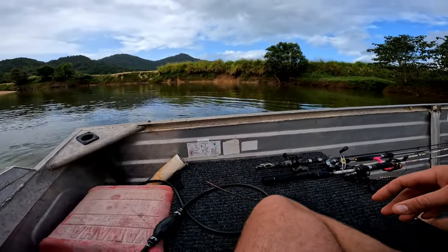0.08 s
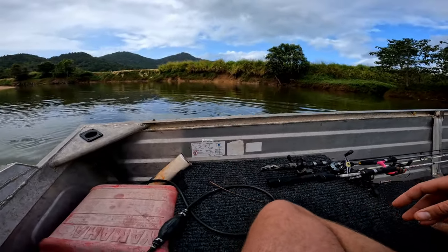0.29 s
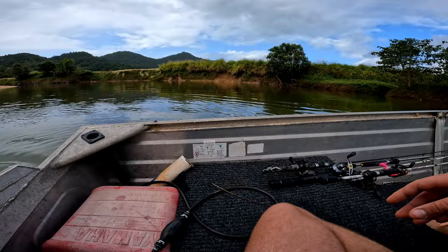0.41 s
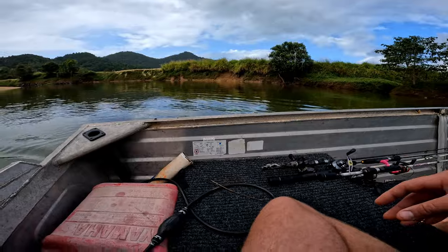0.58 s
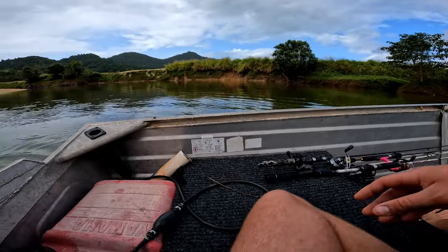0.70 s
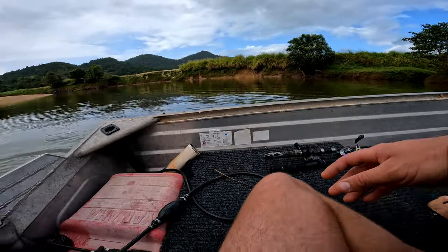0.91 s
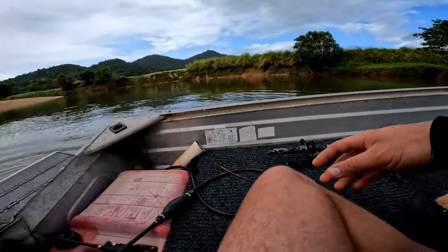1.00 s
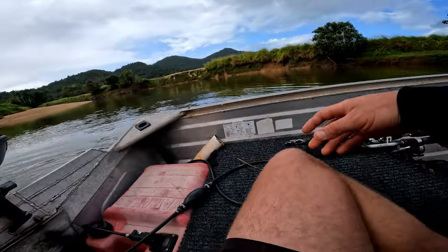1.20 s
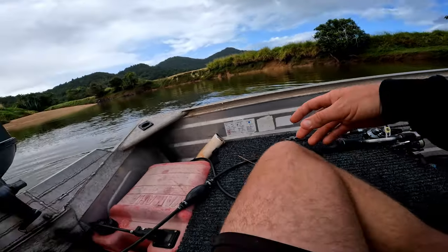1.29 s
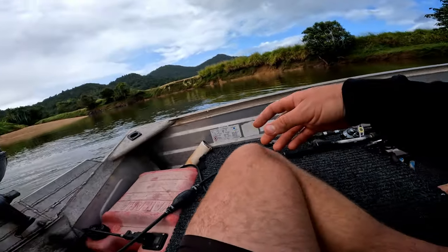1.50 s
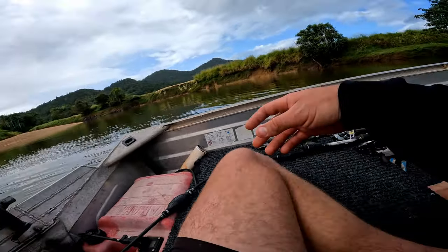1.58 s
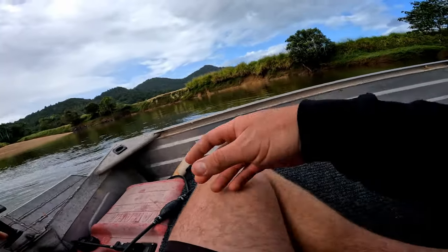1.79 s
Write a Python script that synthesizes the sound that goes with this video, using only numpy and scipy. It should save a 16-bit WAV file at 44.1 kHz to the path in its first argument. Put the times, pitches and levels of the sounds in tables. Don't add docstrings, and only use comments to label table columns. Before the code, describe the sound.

Close on board a small metal boat: faint drips, then a fast burst of hollow hull thuds, clanks and sharp cracks, a low ringing hum, soft rubbing on seat and mat, and late light knocks with metallic ticks.

```python
import sys
import numpy as np
from scipy import signal
from scipy.fft import rfft, irfft
from scipy.io import wavfile
from scipy.ndimage import uniform_filter1d

SR = 44100
rng = np.random.default_rng(int(sys.argv[2]) if len(sys.argv) > 2 else 0)


def unload_audio(sound):
    columns = np.transpose(np.atleast_2d(sound))
    steps = np.round(np.clip(columns, -1, 1) * 32767)
    wavfile.write(sys.argv[1], SR, steps.astype(np.int16))


def gain_from_db(level_db):
    decades = np.asarray(level_db, float) / 20
    return 10 ** decades


N = 81585
T = np.arange(N) / SR

# f/Hz, level/dB
RIVER_COLOUR = [(30, 8), (55, -0.5), (130, 1), (280, -18.5), (420, -24.5), (700, -54), (1500, -31),
                (3000, -88)]
# f/Hz, level/dB
AIR_COLOUR = [(1000, -3), (2500, -6), (4000, -6), (5400, 0), (6400, -5), (7200, -20), (12400, -25),
              (15000, -36)]
# t/s, level/dB
AIR_DIP = [
    (0, -7.5),
    (.17, 4.5),
    (.45, 2),
    (.65, -3.5),
    (.72, -6.5),
    (1.6, 7),
    (1.85, 3.5),
]
# t/s, f/Hz, level/dB, t60/s
PANEL_RINGS = [(-.004, 227.7, -21, 0.095), (.029, 214.5, -24, 0.082), (0.06, 221, -33.5, 0.096),
               (.205, 910, -17.5, 0.073), (.2035, 121, -6.5, 0.086), (0.208, 336, -19.5, 0.067),
               (0.223, 290.3, -13, 0.12), (.226, 676, -24.5, 0.14), (.243, 112.5, -11, 0.11),
               (0.261, 1276, -30, 0.084), (.278, 765, -26.5, 0.18), (.322, 956, -23, 0.034),
               (0.328, 109.3, -8, 0.15), (.33, 324, -18.5, 0.19), (.331, 442.3, -27, 0.24),
               (.332, 494, -24, 0.14), (0.412, 166, -15.5, 0.064), (0.588, 935, -54, 0.12),
               (.59, 1258, -45, 0.086), (.61, 63.6, -25, 0.33), (.772, 290, -44.5, 0.18),
               (.772, 200, -49, 0.092), (1.074, 103, -27.5, 0.095), (1.082, 378, -30.5, 0.053),
               (1.084, 278, -35.5, .08), (1.539, 1320, -43, .04), (1.542, 913, -40, 0.036),
               (1.543, 1945, -53, 0.05), (1.552, 290, -26.5, 0.11), (1.5725, 193, -22.5, 0.17),
               (1.577, 2600, -48, 0.055), (1.596, 630, -55, 0.042), (1.1, 290, -38, 0.085),
               (1.083, 564, -40.5, 0.053), (1.134, 470, -45, 0.07), (1.136, 700, -46, 0.047),
               (.204, 1520, -23, .05), (.206, 1880, -26, .05), (.324, 1640, -29, .05),
               (.171, 616, -35, 0.055), (.29, 1046, -32, 0.069), (1.555, 109, -28, .06),
               (.355, 254, -17.5, .08), (1.578, 51.6, -18, 0.16), (1.59, 125, -32, 0.15),
               (1.69, 51, -33.5, 0.42)]
# t/s, boom level/dB, boom centre f/Hz, knock level/dB, crack level/dB
BOUNCES = [(.171, -36.5, 250, -42.5, -77), (0.187, -33, 180, -59, -64), (.203, -34.5, 258, -25, -32),
           (0.2069, -30.5, 297, -21, -42), (0.2096, -19.5, 200, -20.5, -48.5),
           (0.221, -26, 270, -46, -41.5), (0.242, -24, 130, -31, -85), (0.266, -39, 90, -27.5, -65),
           (.289, -41.5, 200, -25.5, -37), (.296, -28, 243, -22, -58), (.322, -24, 291, -17.5, -41),
           (0.3292, -10.5, 150.5, -21, -64), (.353, -16, 210, -29, -46), (.367, -8, 85.8, -28, -68),
           (0.384, -37, 107, -29.5, -81), (0.413, -35, 152, -54, -61.5), (.455, -20, 170, -73, -70),
           (0.509, -18.5, 71, -78, -90), (0.534, -17, 77.4, -74, -85)]
# t/s, boom level/dB, boom centre f/Hz, knock level/dB, crack level/dB
LIGHT_KNOCKS = [(.004, -52, 229, -54, -78), (0.028, -72, 205, -61, -97), (0.588, -44, 70, -37.5, -69),
                (0.686, -43, 197, -46.5, -88), (0.770, -42.5, 246, -36, -53.5),
                (1.068, -37.5, 340, -49.5, -78), (1.075, -34.5, 109, -50.5, -81),
                (1.083, -31, 420, -42, -55.5), (1.133, -39.5, 420, -46.5, -86),
                (1.542, -45, 290, -39.5, -38), (1.5535, -30, 258, -66, -58),
                (1.565, -25.5, 116.4, -62, -55), (1.5772, -24, 180, -48.5, -47),
                (1.593, -23, 130, -55, -80), (1.626, -32.5, 59.4, -67, -75), (1.655, -37, 160, -79, -80),
                (1.702, -48, 43.7, -92, -82)]
# f/Hz, level/dB, t60/s
PANEL_MODES = [(42.8, -28, 0.18), (63.1, -1.5, 0.49), (101.6, -2.5, 0.41), (125.6, 5.5, 0.11),
               (164.3, -3.5, 0.29), (205, -4, 0.22), (225.4, -6, 0.14), (260.7, -5, 0.32), (290, -7, 0.38),
               (340.7, -1, 0.13), (420, 3.5, 0.054), (536, 3, 0.044), (618, -3.5, 0.086)]
# f/Hz, level/dB, t60/s
RIB_MODES = [(389, -8.5, 0.2), (441, -4, 0.063), (496.3, -9.5, 0.22), (565, -7, 0.11), (670.7, -7.5, 0.096),
             (797.5, -3, 0.073), (887, -2.5, 0.051), (954, -8, 0.11), (1056, -4, 0.05), (1212, -13, 0.13),
             (1650, -7, 0.039), (2180, -16, 0.12)]
# f/Hz, level/dB
KNOCK_COLOUR = [(250, 19), (500, 3), (1000, 3), (1600, 0), (2500, -11), (3600, -11.5), (5000, -58.5)]
# f/Hz, level/dB
CRACK_COLOUR = [(2000, 12), (3500, 2.5), (4500, 1), (6200, 2), (7000, -11), (9000, -24)]
# f/Hz, level/dB
SHEEN_COLOUR = [(6800, -12.5), (8000, -12), (9000, -12.5), (9700, -7.5), (11200, -13), (12400, 0),
                (13500, -9), (15000, -22)]
# t/s, level/dB
RATTLE = [
    (.165, -61.5),
    (.18, -35),
    (.21, -37),
    (.3, -29),
    (.38, -43),
    (.43, -47.5),
    (.56, -64.5),
    (.7, -72),
]
# t/s, level/dB
EDGE_SCRAPE = [
    (.165, -73.5),
    (.185, -58),
    (.202, -34.5),
    (.235, -62),
    (.272, -53.5),
    (.29, -43),
    (.315, -58.5),
    (.36, -51.5),
    (.42, -79),
]
# t/s, f/Hz, level/dB, t60/s
DRIPS = [
    (.005, 1380, -64, .6),
    (.14, 800, -45, .12),
    (.788, 1140, -42, .09),
    (1.403, 1750, -51, .07),
]
# f/Hz, start level/dB, t60/s, wobble/dB
HUM_MODES = [
    (130, -32, 9.7, 0.5),
    (282, -53, 18.4, 3),
    (210.8, -57.5, 51, 2.5),
    (58, -48, 15, 5),
    (567, -44.5, 0.76, -1),
    (307.7, -32.5, 0.87, 2),
]
# t/s, level/dB
HUM_DRIVE = [
    (.36, 4.5),
    (.68, -1.5),
    (.8, 2),
    (.9, -2.5),
    (1.02, -6),
    (1.11, 1.5),
    (1.16, 1.5),
    (1.5, 0.5),
    (1.85, -0.5),
]
# t/s, level/dB
FOOT_DRAG = [
    (.6, -67),
    (.7, -53.5),
    (1.15, -60.5),
    (1.35, -53),
    (1.52, -51.5),
    (1.62, -49.5),
    (1.68, -88),
    (1.78, -57.5),
]
# f/Hz, level/dB
MAT_COLOUR = [(280, 9), (420, 2.5), (700, -8), (1100, -14.5)]
# t/s, level/dB, sheen level/dB
CLOTH_SLIDE = [
    (.62, -116, -1.5),
    (.665, -72, 0),
    (.69, -57.5, -4.5),
    (.9, -57, -1),
    (1.03, -58.5, -3),
    (1.07, -65.5, -1),
    (1.2, -64, -0.5),
    (1.52, -59.5, -1),
    (1.63, -72, 3),
]
# f/Hz, level/dB
CLOTH_COLOUR = [(800, 5.5), (1100, 1), (1700, -1), (2600, 1), (3800, -5.5), (5800, -6), (7000, -17.5)]
# f/Hz, level/dB, t60/s
FITTING_MODES = [(1510, -6, 0.014), (2100, -18, 0.021), (2590, -2.5, 0.057), (3230, -1, 0.023),
                 (4610, -7.5, 0.057)]
# t/s, level/dB
FITTING_TAPS = [
    (1.541, -41),
    (1.544, -56),
    (1.577, -42),
    (1.623, -56.5),
    (1.669, -66),
]

BLOW_S, BOOM_DB, BOOM_CENTRE_HZ, KNOCK_DB, CRACK_DB = np.vstack([BOUNCES, LIGHT_KNOCKS]).T
RISE_S, CRACK_RISE_S = 0.00091, 0.00085


def curve(table, axis=1):
    points = np.array(table)
    return gain_from_db(np.interp(T, points[:, 0], points[:, axis]))


def noise(colour):
    hz, db = np.array(colour).T
    f = np.log(np.fft.rfftfreq(N, 1 / SR) + 1)
    outside = np.maximum(np.log(hz[0]) - f, 0) + np.maximum(f - np.log(hz[-1]), 0)
    gain = gain_from_db(np.interp(f, np.log(hz), db) - 17 * outside)
    x = irfft(rfft(rng.standard_normal(N)) * gain, N)
    return x / x.std()


def walk(rate_hz):
    k = int(SR / rate_hz)
    steps = np.repeat(rng.standard_normal(N // k + 1), k)
    x = uniform_filter1d(uniform_filter1d(steps, k), k)[:N]
    return x / x.std()


def ring(push, hz, t60):
    pole = np.exp((2j * np.pi * hz - np.log(1000) / t60) / SR)
    return signal.lfilter([1], [1, -pole], push).imag


def spikes(times, gains):
    x = np.zeros(N)
    x[(times * SR).astype(int)] = gains
    return x


def fade(x, t60, rise_s=RISE_S):
    fall = np.exp(-np.log(1000) / t60 / SR)
    rise = np.exp(-1 / rise_s / SR)
    return signal.lfilter([1 - rise], [1, -rise], signal.lfilter([1], [1, -fall], x))


def panels(modes, times, gains, push_s, shake):
    out = 0
    for (hz, db, t60), mode_gains in zip(modes, gains):
        out = out + gain_from_db(db) * ring(spikes(times, mode_gains) + shake, hz, t60)
    u = np.arange(512) / SR / push_s
    push = np.sin(np.pi * np.minimum(u, 1)) ** 2
    return signal.fftconvolve(out, push / push.sum())[:N]


def struck_sine(s, hz, db, t60, rise_s, glide=0):
    u = np.maximum(T - s, 0)
    level = gain_from_db(db - 60 * u / t60) * (1 - np.exp(-u / rise_s))
    return level * np.sin(2 * np.pi * hz * u * (1 + glide * u))


def river_and_air():
    water = gain_from_db(-44.5 + 0.93 * walk(7.9)) * noise(RIVER_COLOUR)
    air = gain_from_db(-75.5 + 0.27 * walk(6.7)) * curve(AIR_DIP) * noise(AIR_COLOUR)
    return water + air


def panel_rings():
    return -sum(struck_sine(*event, rise_s=0.00098) for event in PANEL_RINGS)


def panel_boom(grit):
    reach_oct, scatter_db = 0.35, 1.2
    octaves_off = np.log2(np.array(PANEL_MODES)[:, :1] / BOOM_CENTRE_HZ) / reach_oct
    chance = rng.standard_normal(octaves_off.shape)
    gains = -gain_from_db(BOOM_DB - 2.0 - 5.7 * octaves_off ** 2 + scatter_db * chance)
    return panels(PANEL_MODES, BLOW_S, gains, 0.0018, grit * gain_from_db(6.5))


def rib_clank(grit):
    sign, chance = rng.standard_normal((2, len(RIB_MODES), len(BLOW_S)))
    gains = np.sign(sign) * gain_from_db(KNOCK_DB - 7 + 3 * chance)
    return panels(RIB_MODES, BLOW_S, gains, 0.0005, grit)


def knock_noise(rattle):
    blows = fade(spikes(BLOW_S, gain_from_db(KNOCK_DB)), 0.067)
    return (gain_from_db(-2.5) * blows + gain_from_db(-10.5) * rattle) * noise(KNOCK_COLOUR)


def edge_crack():
    scrape = curve(EDGE_SCRAPE)
    blows = spikes(BLOW_S, gain_from_db(CRACK_DB))
    tail = gain_from_db(-34) * fade(blows, 0.55)
    body = fade(blows, 0.047, CRACK_RISE_S) + tail + scrape * gain_from_db(2.9 * walk(200))
    sharp = spikes(BLOW_S, gain_from_db(-32 + 1.4 * (CRACK_DB + 30.5)))
    spark = fade(sharp, 0.032, CRACK_RISE_S) + gain_from_db(-11.5) * scrape
    return body * noise(CRACK_COLOUR) + spark * noise(SHEEN_COLOUR)


def hull():
    rattle = curve(RATTLE) * gain_from_db(1.5 * walk(59.0))
    grit = rattle * rng.standard_normal(N) * 0.031
    return panel_boom(grit) + rib_clank(grit) + knock_noise(rattle) + edge_crack()


def drips():
    return sum(struck_sine(*drop, rise_s=0.0034, glide=0.083) for drop in DRIPS)


def floor_hum():
    u = np.maximum(T - 0.36, 0)
    rise = 1 - np.exp(-u / 0.01)
    out = 0
    for hz, db, t60, wobble_db in HUM_MODES:
        level = gain_from_db(db - 60 * u / t60 + wobble_db * walk(7.73))
        phase = 2 * np.pi * hz * T + 0.28 * wobble_db * walk(3.87)
        out = out + rise * level * np.sin(phase)
    return curve(HUM_DRIVE) * out


def foot_drag():
    return curve(FOOT_DRAG) * gain_from_db(1.5 * walk(30.1)) * noise(MAT_COLOUR)


def cloth_slide():
    sheen = gain_from_db(-9) * curve(CLOTH_SLIDE, axis=2) * noise(SHEEN_COLOUR)
    flicker = gain_from_db(0.8 * walk(25) + walk(150))
    return curve(CLOTH_SLIDE) * flicker * (noise(CLOTH_COLOUR) + sheen)


def fitting_taps():
    s, db = np.array(FITTING_TAPS).T
    chance = rng.standard_normal((len(FITTING_MODES), len(s)))
    spark = fade(spikes(s, gain_from_db(db - 4.5)), 0.0165) * noise(SHEEN_COLOUR)
    return panels(FITTING_MODES, s, gain_from_db(db + 2 * chance), 0.00018, 0) + spark


def scene():
    blows = panel_rings() + hull()
    friction = foot_drag() + cloth_slide()
    mono = river_and_air() + blows + drips() + floor_hum() + friction + fitting_taps()
    return np.tile(mono, (2, 1))


def top_cut(x):
    return signal.sosfilt(signal.butter(12, 15840, fs=SR, output="sos"), x)


def record(dry):
    bass_cut = signal.butter(2, 37, "high", fs=SR, output="sos")
    left, right = signal.sosfilt(bass_cut, dry)
    dull = signal.sosfiltfilt(signal.butter(10, 10400, fs=SR, output="sos"), right)
    leak = gain_from_db(-15) * (right - dull) * (0.3 + walk(915))
    return top_cut(np.array([left, dull + leak]))


dry = scene()
out = record(dry)
unload_audio(out)
```